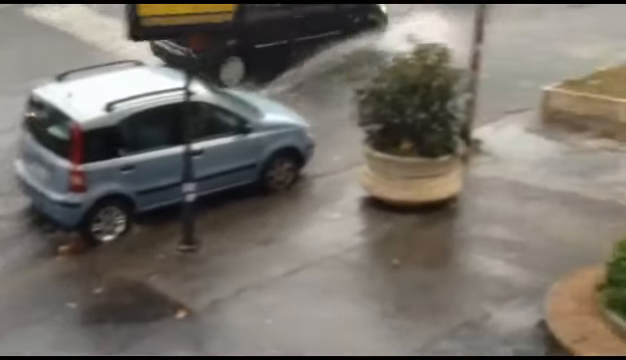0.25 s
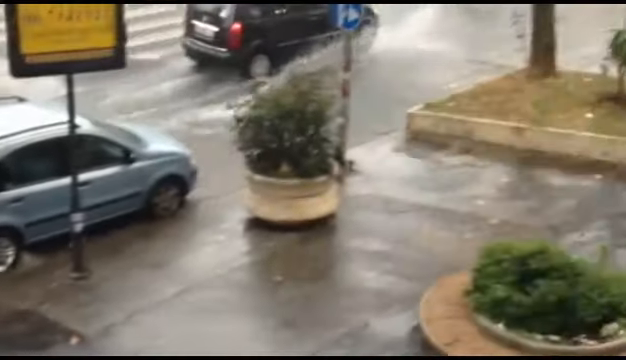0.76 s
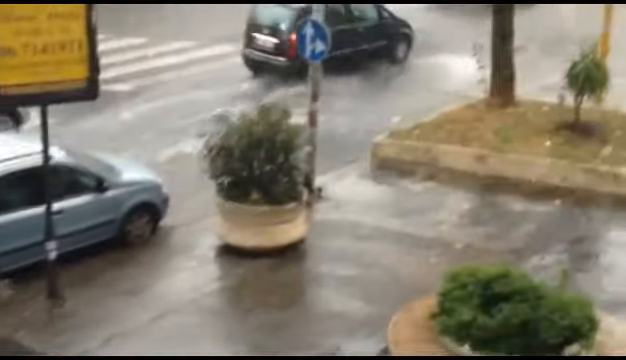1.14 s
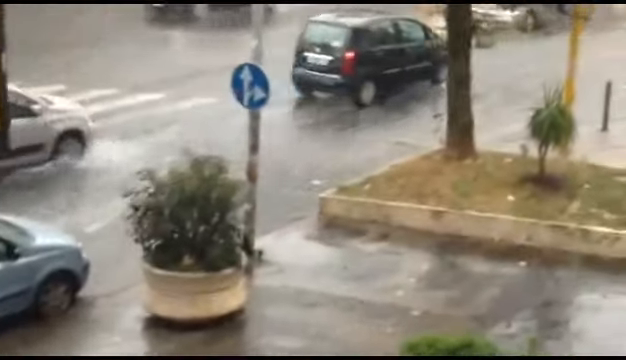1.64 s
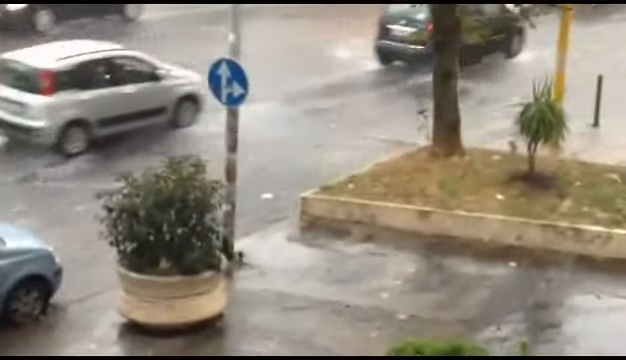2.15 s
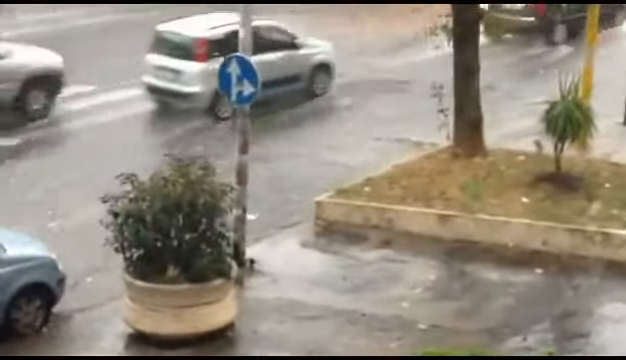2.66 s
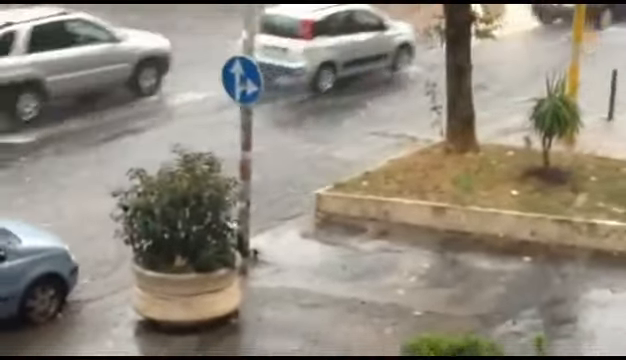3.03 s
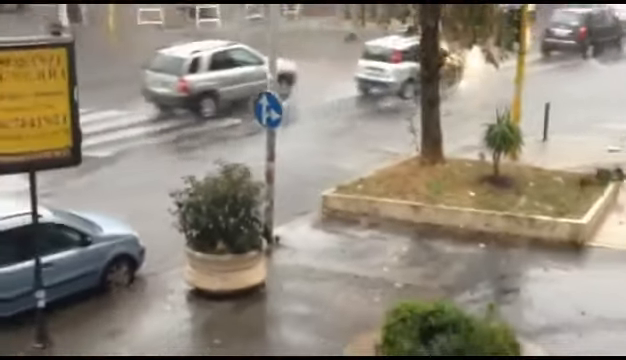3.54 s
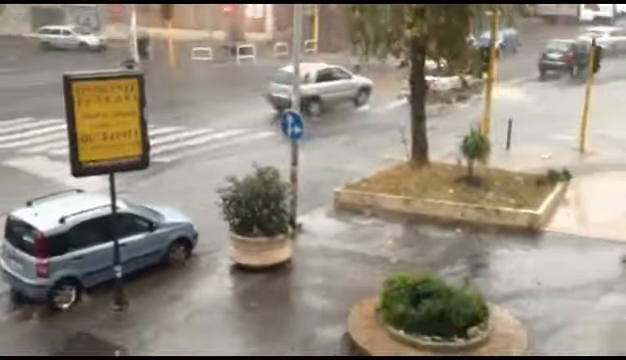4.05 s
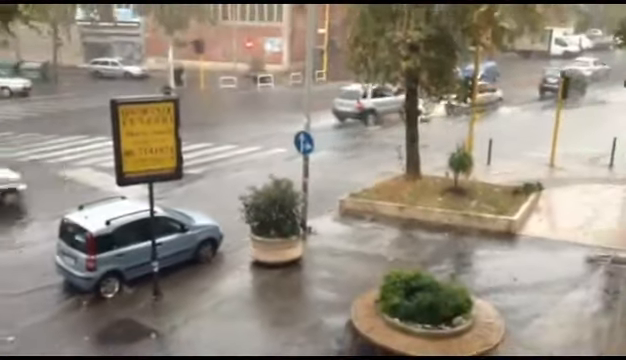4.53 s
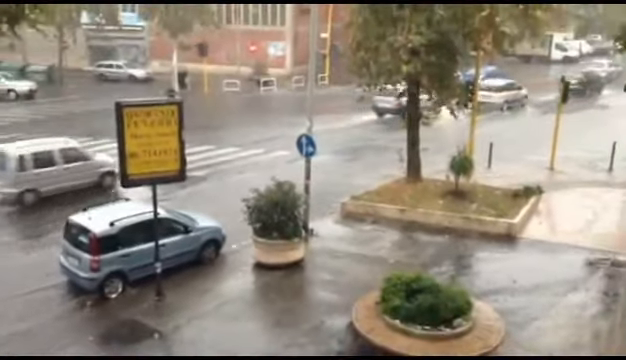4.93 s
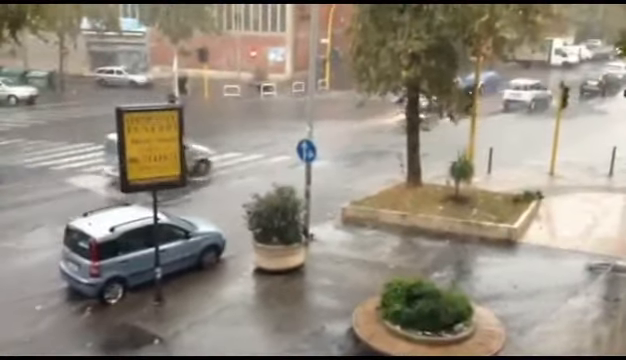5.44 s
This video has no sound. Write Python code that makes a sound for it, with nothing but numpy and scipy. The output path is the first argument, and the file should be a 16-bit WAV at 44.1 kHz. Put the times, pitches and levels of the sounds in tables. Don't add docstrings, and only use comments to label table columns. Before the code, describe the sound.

Heavy rain falls as a dense, bright, continuous hiss on a flooded street. Cars pass one after another, their tyre spray swelling gently and overlapping over soft roar, low rumble and faint engine drone. Small gurgles, plops and ticks speckle the wash. At about 3.7 seconds a drop cracks close by and the level dips, then creeps back. Near-mono small camera microphone at a window above.

```python
import sys
import numpy as np
from scipy import signal
from scipy.fft import rfft, irfft
from scipy.io import wavfile
from scipy.ndimage import uniform_filter1d

SR = 44100
rng = np.random.default_rng(int(sys.argv[2]) if len(sys.argv) > 2 else 0)


def amplitude_ratio(level_db):
    exponent = np.asarray(level_db, float) / 20
    return 10 ** exponent


def store_wav(level_fs):
    pcm = np.round(np.clip(np.atleast_2d(level_fs), -1, 1) * 32767)
    wavfile.write(sys.argv[1], SR, pcm.T.astype(np.int16))


N = 250929

# freq_hz, density_db_per_hz
SPRAY_SPECTRUM = [(700, -20.5), (1100, -1.5), (1500, -0.5), (2000, 1), (2600, -1), (3500, -6.5),
                  (5000, -13), (8000, -27.5)]
# freq_hz, density_db_per_hz
HISS_SPECTRUM = [(1500, -1.5), (3000, 3), (5000, 0), (7000, -1), (10000, -4.5), (12500, -8.5),
                 (14000, -9.5), (14900, -11), (15300, -38)]
# freq_hz, density_db_per_hz
ROAR_SPECTRUM = [(300, -22.5), (480, -4), (650, 0.5), (800, 0.5), (1000, 1), (1300, -4), (2000, -14)]
# freq_hz, density_db_per_hz
RUMBLE_SPECTRUM = [(25, -38), (60, -34), (90, -27), (120, -15.5), (155, -5.5), (250, 0), (420, -3),
                   (600, -6), (900, -34.5)]
# closest_s, spray_db, roar_db, passing_s
PASSES = [(.22, -28.5, -31.5, 0.12), (.5, -27, -30.5, .2), (.85, -29, -29.5, 0.18), (1.2, -29, -31, 0.19),
          (1.55, -27, -29, .2), (1.92, -24.5, -31.5, 0.26), (2.25, -25.5, -30, .2), (2.6, -26, -34.5, 0.17),
          (2.85, -32, -38, .2), (3.05, -24.5, -34.5, 0.25), (3.28, -25.5, -41, 0.19),
          (3.52, -24.5, -29.5, 0.25), (3.84, -24, -30.5, 0.13), (4.05, -25, -35, .15),
          (4.35, -26.5, -36, 0.3), (4.6, -26.5, -31, .2), (4.8, -29, -34.5, 0.2), (5.02, -25, -29, 0.16),
          (5.3, -27.5, -31, 0.23), (5.55, -30, -37.5, 0.23)]
# time_s, level_db
RAIN = [(0, -28), (.7, -28), (1.2, -28), (1.6, -28.5), (1.8, -28.5), (2.4, -27.5), (2.75, -29.5), (3, -28),
        (3.4, -27.5), (3.8, -27.5), (4, -30), (4.4, -28.5), (4.8, -27.5), (5.2, -28.5), (5.45, -29),
        (5.7, -28.5)]
# time_s, level_db, heavy_engine_depth_db
LOAD = [(0, -33.5, -2), (.25, -33, 0), (.5, -32, 1.5), (1.05, -35.5, 2.5), (1.25, -35.5, -1),
        (1.45, -34.5, 1.5), (2.2, -34, -2), (2.37, -32, -3), (2.75, -35.5, 3), (3, -35, 4.5),
        (3.2, -34.5, -3), (3.55, -32.5, -1), (3.9, -32.5, -2), (4.2, -35, -4), (4.5, -31.5, -3),
        (4.8, -36, -11), (5.05, -32.5, -4), (5.7, -32, -2)]
# centre_s, gain_db
SHEETS = [(0.05, 0), (0.079, 1.3), (0.32, -0.5), (0.528, 0), (0.616, 0.2), (0.659, 1.3), (0.759, -0.5),
          (0.818, 1.3), (1.051, -0.8), (1.36, 0.5), (1.397, -0.5), (1.423, 0.8), (1.444, -1.5),
          (1.516, -1.1), (1.664, -0.3), (1.705, 0.5), (1.753, 1.7), (1.858, 0.5), (1.902, 1), (1.953, 0.7),
          (2.026, 0.8), (2.117, 0), (2.298, 0.3), (2.572, -1.8), (2.719, -1.5), (2.772, 0), (2.821, -0.5),
          (2.887, -0.3), (2.922, 2), (2.99, -0.5), (3.088, 2), (3.13, -0.9), (3.242, 0.7), (3.283, -0.8),
          (3.392, -0.3), (3.491, 1.0), (3.534, 0.7), (3.573, -0.5), (3.62, 1), (3.759, -0.2), (3.802, -0.9),
          (3.842, -0.5), (3.923, -1.2), (3.971, -1.1), (4.019, 0.5), (4.048, -1.5), (4.4, -1.5),
          (4.454, 0.5), (4.487, -1.0), (4.608, 0), (4.753, 0.5), (4.855, -0.3), (4.979, 0.3), (5.019, 0.5),
          (5.136, -1), (5.189, 0.5), (5.278, -0.5), (5.321, -0.9), (5.431, 0.9), (5.49, -2)]
# centre_hz, width_hz, gain_db
RECESS = [(288, 31, -1.5), (374, 23, 1.5), (437, 25, -2.1), (555, 39, 1.7), (795, 35, -1), (1020, 35, -0.5),
          (1157, 50, 0.8), (1303, 41, -1.5), (1466, 34, 0.3), (1620, 21, -0.5), (1946, 61, -1),
          (2156, 120, 0.6), (2695, 70, 1), (3440, 78, -0.4)]
# time_s, rate_hz
REVS = [
    (0, 78),
    (.65, 76),
    (1.08, 82.5),
    (1.3, 78),
    (1.5, 76),
    (2.2, 82),
    (2.6, 79),
    (4.9, 77),
    (5.2, 78.2),
    (5.7, 77.5),
]
# centre_s, length_s, level_db, firing_rate_multiple
ENGINE_NOTES = [(.81, 0.032, -39, 2), (.98, 0.17, -41, 2), (1.403, 0.025, -40, 2), (1.985, 0.025, -43, 2),
                (1.645, 0.15, -46, 3), (3.25, .12, -53, 3), (1.0, .15, -41.5, 3), (1.85, 0.42, -48, 2),
                (1.998, 0.18, -45, 3), (4.293, 0.53, -44, 3), (5.136, 0.24, -38, 4),
                (5.318, 0.19, -46.5, 2), (5.58, 0.13, -43, 3)]
# centre_s, peak_db, pitch_hz
GURGLES = [(0.07, -27, 564), (0.328, -29.6, 947), (0.662, -26, 1700), (0.679, -27, 2020),
           (0.888, -25, 1220), (0.929, -31, 256), (0.935, -29.3, 2649), (0.946, -26, 1690),
           (1.062, -29, 278), (1.08, -28.3, 2272), (1.12, -28, 3359), (1.159, -31.1, 3200),
           (1.268, -30, 3730), (1.321, -24, 1723), (1.355, -31.4, 3348), (1.361, -28, 850),
           (1.399, -30.0, 256), (1.416, -29.5, 1400), (1.419, -26, 2401), (1.567, -33, 910),
           (1.579, -25, 2153), (1.75, -27.8, 1200), (1.892, -25, 1820), (1.953, -24, 3070),
           (1.956, -24, 907), (2.02, -27.7, 1550), (2.069, -24, 1144), (2.229, -27.2, 2046),
           (2.299, -28, 3391), (2.328, -26, 355), (2.543, -29, 3740), (2.563, -26, 870), (2.601, -28, 3010),
           (2.627, -30.7, 3122), (2.699, -27, 1324), (2.932, -32, 388), (3.181, -30.9, 517),
           (3.306, -26, 606), (3.306, -27.7, 2840), (3.37, -27.5, 3560), (3.511, -23, 1093),
           (3.529, -28.6, 3090), (3.849, -29, 2982), (3.878, -35, 1798), (4.008, -26, 2099),
           (4.017, -25, 1440), (4.18, -28, 255), (4.444, -30.2, 2400), (4.493, -31.2, 581),
           (4.606, -30.5, 2900), (4.751, -23, 1790), (4.778, -29, 3370), (4.952, -29.3, 915),
           (4.984, -27.7, 2160), (5.146, -33, 2885), (5.152, -24, 937), (5.494, -29, 920),
           (5.55, -36, 3714), (5.59, -30, 1206), (5.599, -36, 3180)]
# start_s, peak_db, ring_hz, t60_s
CRACKS = [
    (.0795, -14, 5000, .003),
    (1.1497, -15, 2300, .008),
    (1.9499, -14, 2900, .007),
    (1.4303, -6.5, 9000, .0025),
    (3.67382, -2.8, 8600, .0042),
    (3.7474, -10, 7000, .006),
    (5.2784, -11.5, 7000, .004),
    (5.5921, -7, 8500, .0013),
]
SILL_MODES = [(.49, -.45), (.72, .55), (1, 1), (1.2, .35), (1.43, .65), (1.7, -.45)]
# start_s, peak_db, pitch_hz
PUFFS = [(.135, -43, 95), (.33, -49, 95), (.445, -37, 85), (1.07, -50, 90), (2.08, -53, 85),
         (2.83, -50, 80), (2.9, -51, 85), (3.01, -46, 95), (3.43, -48, 95), (.648, -47, 90),
         (1.83, -46, 95), (3.652, -41, 70), (4.09, -46, 90), (4.175, -44, 90), (4.195, -42, 90),
         (4.298, -39, 85), (4.834, -37, 90), (5, -46, 105), (5.365, -49, 85)]
# centre_s, peak_db, pitch_hz, half_length_s
PLOPS = [(0.2808, -35.1, 9618, 0.006), (0.2824, -26, 9532, 0.0015), (0.8234, -17, 4593, 0.0015),
         (1.08, -24.5, 2300, 0.006), (1.5478, -34.2, 8842, 0.006), (1.5691, -28, 940, 0.006),
         (1.5701, -18, 1033, 0.0013), (1.733, -23, 3301, 0.006), (1.8482, -33, 9933, 0.006),
         (1.9439, -33.3, 9273, 0.006), (2.0223, -31.6, 5400, 0.006), (2.0865, -25.9, 7694, 0.0015),
         (2.1327, -28, 4364, 0.0015), (2.1331, -30, 4280, 0.006), (2.6781, -23, 6546, 0.0015),
         (2.801, -16, 3445, 0.0017), (2.8865, -33.3, 8096, 0.006), (2.9105, -31.9, 7900, 0.006),
         (2.911, -25.6, 7809, 0.0015), (3.0161, -14, 4364, 0.0015), (3.1592, -18, 4450, 0.0015),
         (3.372, -26, 3588, 0.0065), (3.64, -16, 1033, 0.0018), (3.7486, -23, 6660, 0.0015),
         (3.8367, -28, 8842, 0.0015), (3.848, -20, 2957, 0.0061), (3.8857, -39.4, 9417, 0.006),
         (3.9162, -39.1, 9589, 0.006), (3.9461, -26, 5512, 0.0015), (4.12, -17, 1263, 0.0012),
         (4.123, -30, 401, 0.006), (4.2014, -38.9, 9474, 0.006), (4.31, -31.3, 4622, 0.006),
         (4.3114, -25.9, 4593, 0.0015), (4.3565, -25, 7005, 0.0015), (4.486, -20, 574, 0.006),
         (4.4909, -21, 459, 0.0015), (4.7586, -21, 560, 0.006), (4.7608, -35.5, 8957, 0.006),
         (4.9829, -19, 2124, 0.0065), (5.28, -20, 5397, 0.0015), (5.4727, -26, 8200, 0.0015),
         (5.5652, -18, 4938, 0.0015), (5.5924, -26, 8728, 0.0015)]
# freq_hz, step_db
ROUNDING_STEP = [(100, -52), (1000, -33), (3000, -24), (6000, -22.5), (9000, -21), (11500, -18.3),
                 (13500, -17.6), (15000, -15.5)]
# time_s, step_change_db
STEP_DRIFT = [(0, -.8), (2.35, -.3), (2.55, -1.6), (2.85, -1.8), (3.05, .6), (3.64, 1), (3.655, -8),
              (3.69, -8), (3.705, .8), (3.9, 1.6), (3.95, -2.6), (4.3, -2.6), (4.65, -1), (5.2, -1),
              (5.7, -1.6)]
# centre_s, low_hz, high_hz, level_db
SPLITS = [
    (.86, 5600, 7700, -33),
    (.953, 4100, 5800, -34),
    (1.185, 4100, 5300, -36),
    (2.091, 5100, 6400, -36),
    (2.091, 8200, 9800, -37),
    (4.18, 5100, 6400, -41),
    (4.6, 6200, 7700, -40),
    (4.924, 6200, 8400, -36),
    (4.924, 10300, 11800, -43),
    (4.947, 12400, 13900, -50),
]


def evened(x):
    return x / np.sqrt(np.mean(x ** 2) + 1e-20)


def along(rows, column):
    rows = np.array(rows)
    return np.interp(np.arange(N) / SR, rows[:, 0], rows[:, column])


def add(mix, start_s, sound):
    part = mix[round(start_s * SR):][:len(sound)]
    part += sound[:len(part)]


def highpassed(x, order, cutoff_hz):
    return signal.sosfilt(signal.butter(order, cutoff_hz, "highpass", fs=SR, output="sos"), x)


def colour(points, hz):
    f, db = np.transpose(points)
    return amplitude_ratio(np.interp(np.log(hz + 1), np.log(f + 1), db, left=-90, right=-90))


def wash(points, patchy_db, flicker_db, size):
    hop = size // 4
    frames = N // hop + 5
    hz = np.fft.rfftfreq(size, 1 / SR)
    real, imag, patches = rng.standard_normal((frames, len(hz), 3)).T
    patches = uniform_filter1d(patches, size=size // 64, axis=0)
    patches = evened(uniform_filter1d(patches, size=4096 // hop, axis=1))
    flicker = evened(uniform_filter1d(rng.standard_normal(frames), size=2048 // hop))
    gain = colour(points, hz)[:, None] * amplitude_ratio(patchy_db * patches + flicker_db * flicker)
    spectra = (real + 1j * imag) * gain
    return evened(signal.istft(spectra, nperseg=size, noverlap=size - hop)[1][:N])


def drops(low_hz, high_hz, per_s, spread_db, cycles, glide, count):
    out = np.zeros(N)
    kind = rng.integers(0, count, N)
    strength = amplitude_ratio(spread_db * np.minimum(rng.exponential(1, N), 5))
    hits = (rng.random(N) < per_s / SR) * strength
    for k, hz in enumerate(np.geomspace(low_hz, high_hz, count)):
        u = np.arange(int(6 * cycles * SR / hz)) * hz / SR
        envelope = (1 - np.exp(-3 * u)) * np.exp(-u / cycles)
        chirp = np.sin(2 * np.pi * u * (1 + glide * u)) * envelope
        out += signal.oaconvolve(hits * (kind == k), chirp)[:N]
    return evened(out)


def passing(far_db, column):
    t = np.arange(N) / SR
    power = amplitude_ratio(far_db) ** 2
    for row in PASSES:
        power = power + amplitude_ratio(row[column]) ** 2 / (1 + ((t - row[0]) / row[3]) ** 2) ** 2
    return 10 * np.log10(power)


def gusts(depth_db):
    t = np.arange(N) / SR
    waves = sum(np.sin(2 * np.pi * (f * t + rng.random())) for f in np.geomspace(6, 24, 16))
    return amplitude_ratio(depth_db * evened(waves))


def sheets():
    t = np.arange(N) / SR
    width_s = 0.014
    return amplitude_ratio(sum(db * np.exp(-((t - s) / width_s) ** 2) for s, db in SHEETS))


def street():
    spray = wash(SPRAY_SPECTRUM, patchy_db=0.53, flicker_db=-0.4, size=512)
    spray += amplitude_ratio(-11) * drops(900, 4000, per_s=1500, spread_db=3.0, cycles=2.2, glide=.016, count=12)
    spray += amplitude_ratio(-10) * drops(1300, 4000, per_s=1400, spread_db=2.4, cycles=20, glide=.002, count=30)
    hiss = wash(HISS_SPECTRUM, patchy_db=0.34, flicker_db=-0.45, size=256)
    hiss += amplitude_ratio(-12.5) * drops(4000, 11000, per_s=2500, spread_db=5.5, cycles=1.8, glide=.016, count=12)
    roar = wash(ROAR_SPECTRUM, patchy_db=0.73, flicker_db=-0.34, size=1024)
    rumble = wash(RUMBLE_SPECTRUM, patchy_db=0.5, flicker_db=-0.1, size=2048)
    deep = signal.sosfiltfilt(signal.butter(3, 200, fs=SR, output="sos"), rumble)

    spray_db = passing(far_db=-26.5, column=1)
    mist_db = 0.13 * (spray_db - spray_db.mean())
    upper = amplitude_ratio(spray_db - 1.12) * evened(spray)
    upper += amplitude_ratio(along(RAIN, 1) + mist_db + 5.0) * evened(hiss)
    upper = highpassed(upper * gusts(depth_db=.2) * sheets(), 4, 300)
    roar = amplitude_ratio(passing(far_db=-32.5, column=2) - 0.87) * roar * gusts(depth_db=0.4) * sheets()
    rumble = amplitude_ratio(along(LOAD, 1) + 0.26) * (rumble + (amplitude_ratio(along(LOAD, 2)) - 1) * deep)
    return upper + roar + rumble


def recess(x):
    hz = np.fft.rfftfreq(N, 1 / SR)
    gain_db = sum(db * np.exp(-((hz - f) / width) ** 2) for f, width, db in RECESS)
    return irfft(rfft(x) * amplitude_ratio(gain_db), N)


def engines():
    t = np.arange(N) / SR
    waver = evened(uniform_filter1d(rng.standard_normal(N), size=4000))
    turns = np.cumsum(along(REVS, 1) * (1 + 0.0151 * waver)) / SR
    out = sum(amplitude_ratio(-56) * np.sin(2 * np.pi * k * turns) for k in (2, 3, 4))
    for s, length_s, db, k in ENGINE_NOTES:
        swell = np.exp(-((t - s) / length_s) ** 2)
        out += amplitude_ratio(db) * swell * np.sin(2 * np.pi * round(k) * turns)
    return np.sqrt(2) * out


def gurgles(lift_db, half_s):
    out = np.zeros(N)
    for s, db, hz in GURGLES:
        span_s = half_s * (1000 / hz) ** .15
        t = np.arange(-2 * span_s, 2 * span_s, 1 / SR)
        note = np.exp(-(t / span_s) ** 2) * np.sin(2 * np.pi * hz * t)
        add(out, max(s - 2 * span_s, 0), amplitude_ratio(db + lift_db) * note)
    return out


def cracks():
    out, t = np.zeros(N), np.arange(400) / SR
    for s, db, hz, t60_s in CRACKS:
        modes = sum(share * np.sin(2 * np.pi * hz * k * t) for k, share in SILL_MODES)
        ring = modes * amplitude_ratio(-60 * t / t60_s)
        ring = ring / abs(ring).max()
        add(out, s, amplitude_ratio(db) * ring)
        add(out, s + .0023, amplitude_ratio(db - 15) * ring)
    return highpassed(out, 2, 400)


def puffs():
    out, t = np.zeros(N), np.arange(2000) / SR - .014
    faint = [(4.5 * a, -57 + 8 * b, 75 + 55 * c) for a, b, c in rng.random((50, 3))]
    for s, db, hz in PUFFS + faint:
        add(out, s, amplitude_ratio(db) * np.cos(2 * np.pi * hz * t) * np.exp(-(t / .006) ** 2))
    return highpassed(out, 4, 55)


def plops(lift_db, rise):
    out = np.zeros(N)
    for s, db, hz, half_s in PLOPS:
        u = np.arange(-1, 3, 1 / (half_s * SR))
        shape = np.where(u < 0, np.cos(np.pi * u / 2) ** 2, np.exp(-u ** 2))
        tone = np.sin(2 * np.pi * hz * half_s * u * (1 + rise * u))
        add(out, s - half_s, amplitude_ratio(db + lift_db) * shape * tone)
    return out


def scene():
    mono = recess(street()) + engines() + gurgles(lift_db=0.0, half_s=.013) + cracks()
    mono = mono + puffs() + plops(lift_db=-1.0, rise=0.0054)
    return np.tile(mono, (2, 1))


def camera_rounding(x, uneven_db, frame_db):
    hop, lead = 1024, 1024 + 84
    n, k = np.arange(2 * hop)[:, None], np.arange(hop)
    window = signal.windows.kaiser_bessel_derived(2 * hop, 4 * np.pi)[:, None]
    basis = window * np.cos(np.pi / hop * (n + .5 + hop / 2) * (k + .5)) * np.sqrt(2 / hop)
    blocks = np.pad(x, (lead, 3 * hop - (N + lead) % hop)).reshape(-1, hop)
    lines = np.hstack([blocks[:-1], blocks[1:]]) @ basis

    frames = len(lines)
    per_band = np.repeat(rng.standard_normal((frames, hop // 16)), 16, axis=1)
    drift_db = np.interp(np.arange(frames) * hop / SR, *np.transpose(STEP_DRIFT))
    per_frame_db = frame_db * rng.standard_normal(frames) + drift_db
    step = colour(ROUNDING_STEP, np.clip(k * SR / (2 * hop), 101, 14900))
    step = step * amplitude_ratio(uneven_db * per_band + per_frame_db[:, None])

    whole = np.floor(abs(lines / step) ** .75 + .4054)
    out = (np.sign(lines) * whole ** (4 / 3) * step) @ basis.T
    return (out[1:, :hop] + out[:-1, hop:]).ravel()[lead - hop:][:N]


def splits():
    out, hz = np.zeros(N), np.fft.rfftfreq(2048, 1 / SR)
    for s, low_hz, high_hz, db in SPLITS:
        band = irfft(rfft(rng.standard_normal(2048)) * (hz > low_hz) * (hz < high_hz))
        add(out, s - 1024 / SR, amplitude_ratio(db + 1.5) * evened(band) * np.hanning(2048) ** 1.5)
    return out


def ducking(at_s, depth_db, back_s):
    since_s = np.maximum(np.arange(N) / SR - at_s, 0)
    return amplitude_ratio(-depth_db * (1 - np.exp(-since_s / 0.0032)) * np.exp(-since_s / back_s))


def roll_off(x):
    return signal.sosfilt(signal.butter(12, 15710, fs=SR, output="sos"), x)


def record(dry):
    ducked = dry[0] * ducking(3.6755, depth_db=3.5, back_s=1.3)
    mono = camera_rounding(ducked, uneven_db=2.4, frame_db=.55)
    mono = mono * (np.arange(N) < 5.6605 * SR)
    return roll_off(mono + splits() * np.array([[1], [-1]]))


dry = scene()
out = record(dry)
store_wav(out)
```